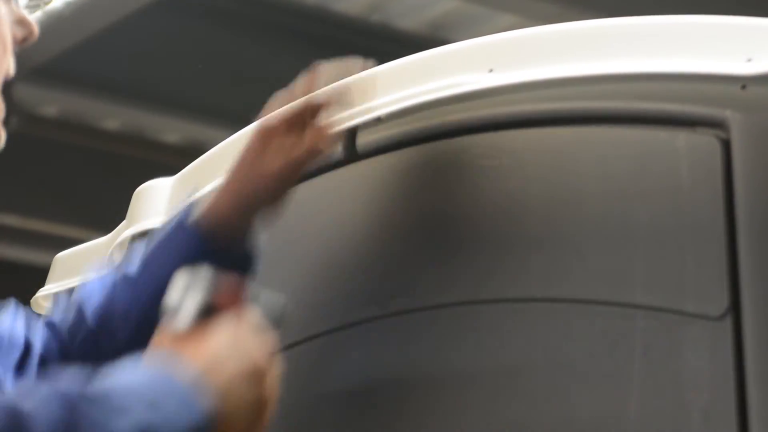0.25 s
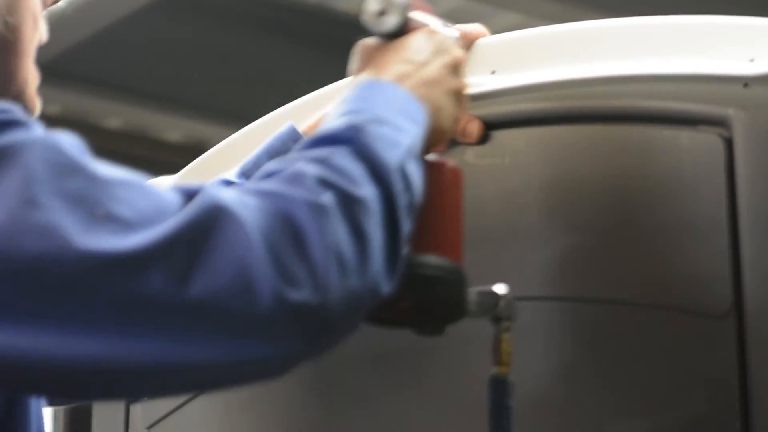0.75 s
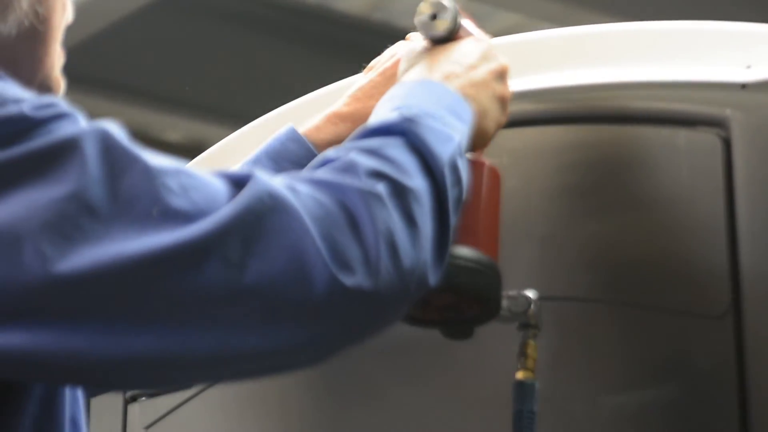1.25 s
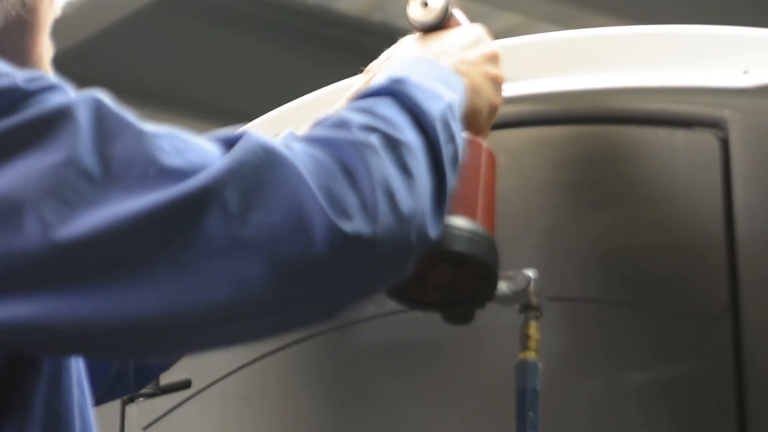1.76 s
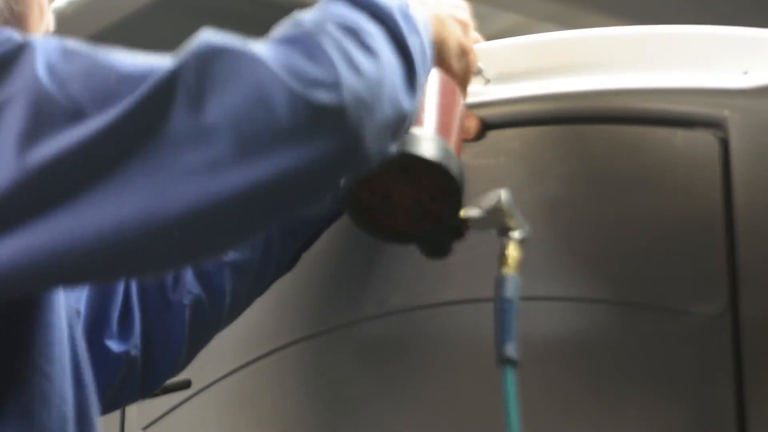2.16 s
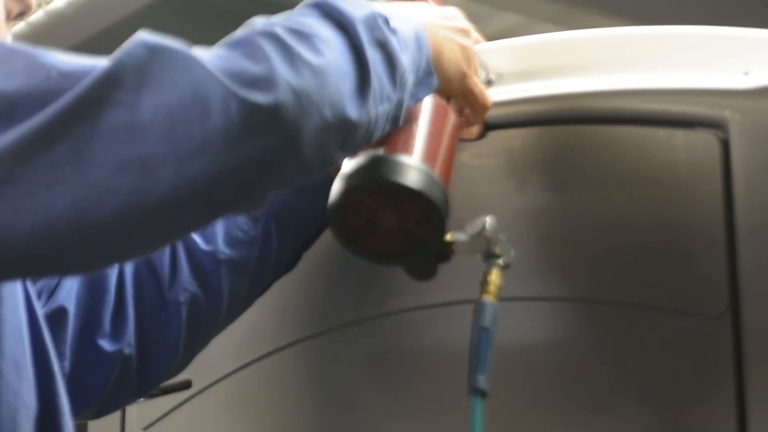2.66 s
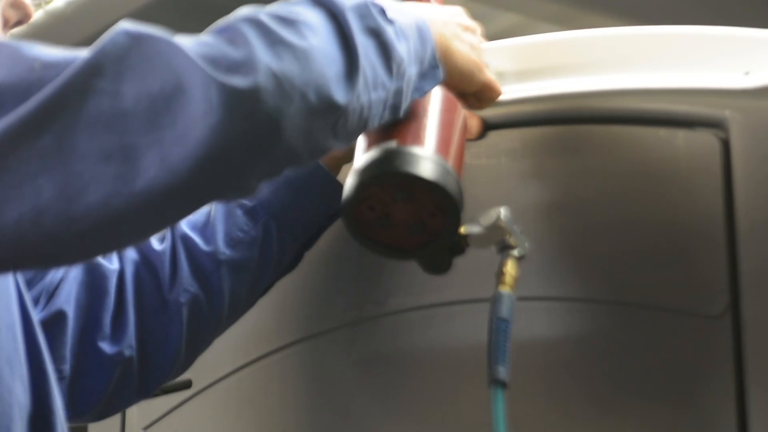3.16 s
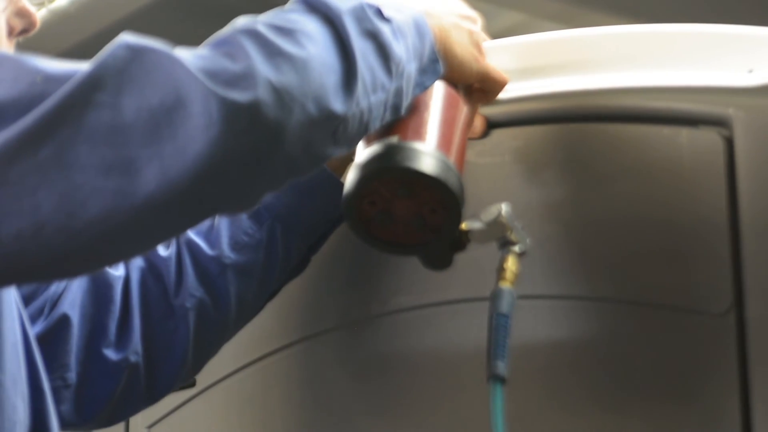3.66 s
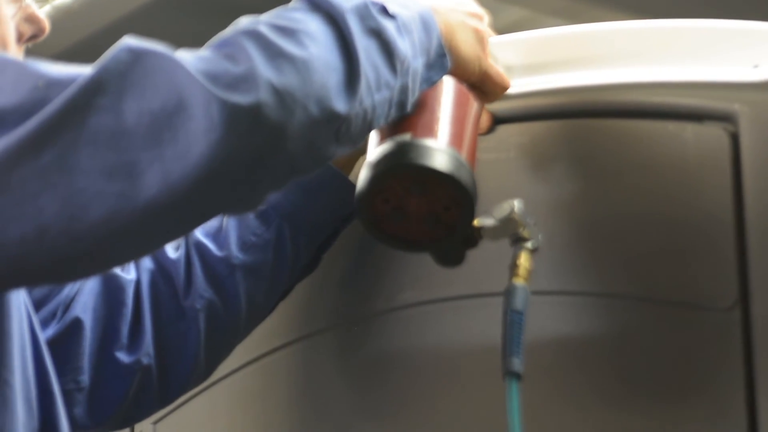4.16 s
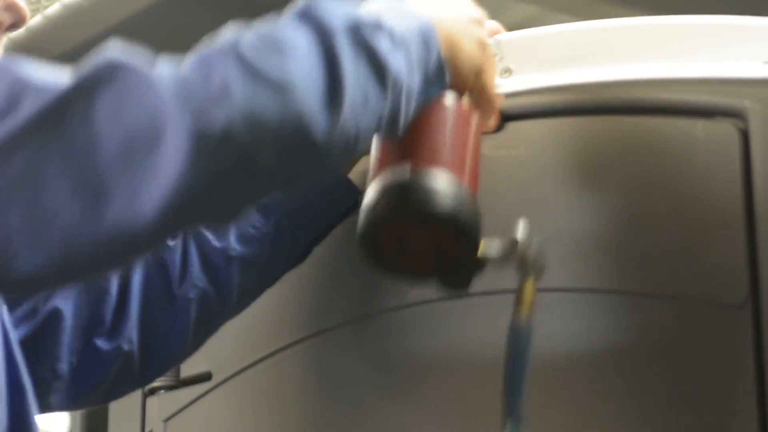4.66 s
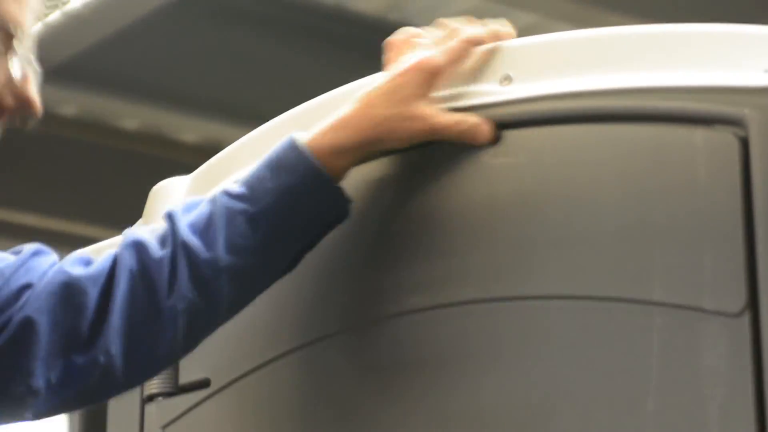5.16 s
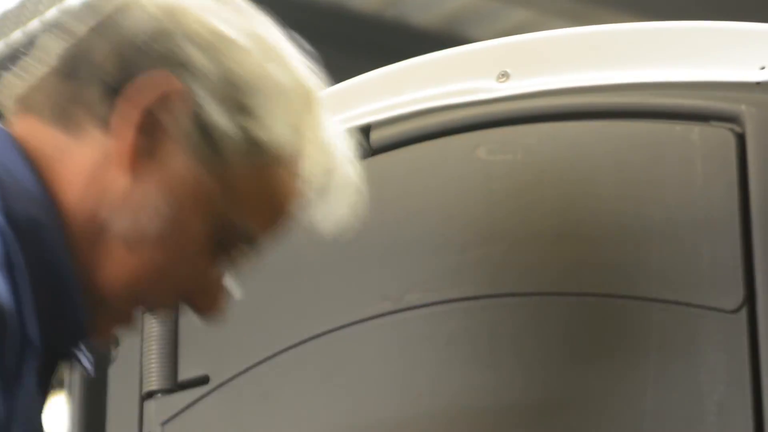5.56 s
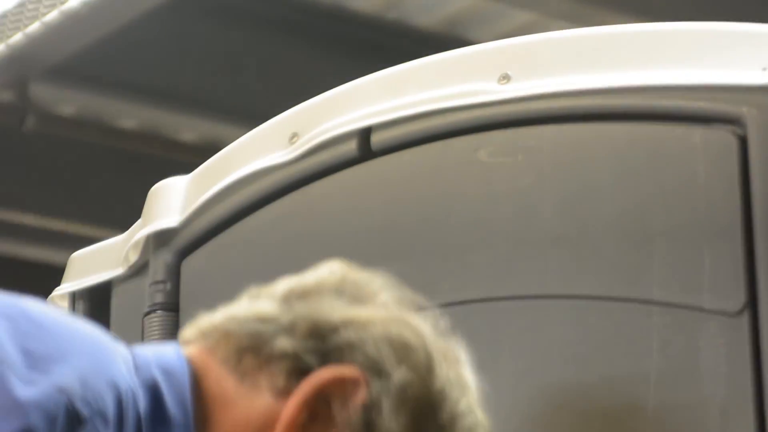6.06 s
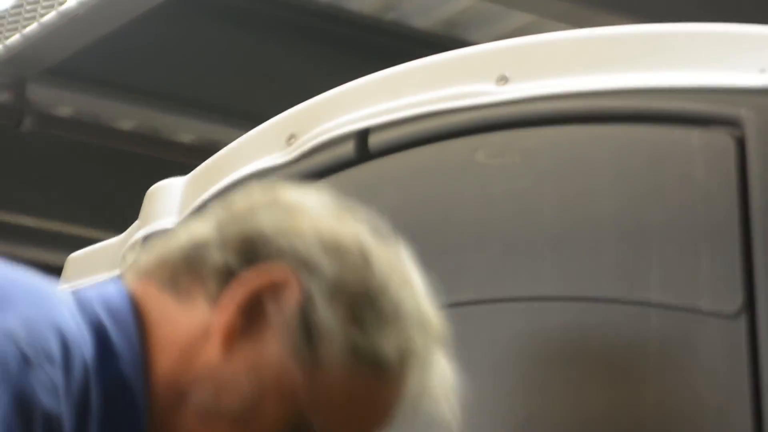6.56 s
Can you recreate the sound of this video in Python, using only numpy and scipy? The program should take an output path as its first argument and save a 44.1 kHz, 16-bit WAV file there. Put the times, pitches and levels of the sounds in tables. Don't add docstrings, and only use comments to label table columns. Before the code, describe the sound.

Steady broadband factory hum with short distant squeaks at first. Nearby, a tool bumps hollow plastic, scrapes and slams, then clicks fast and blasts bright compressed air, which lingers as a hiss. A second, harder snap and sharper blast follow, their hiss dying slowly. Small handling noises and a thin throbbing squeal end it. Close stereo microphone, with reverberation from the hall.

```python
import sys
import numpy as np
from scipy import signal
from scipy.fft import rfft, irfft
from scipy.io import wavfile
from scipy.ndimage import uniform_filter1d

SR = 44100
rng = np.random.default_rng(int(sys.argv[2]) if len(sys.argv) > 2 else 0)


def inscribe(sig):
    pcm = np.round(np.clip(np.atleast_2d(sig).T, -1, 1) * 32767)
    wavfile.write(sys.argv[1], SR, pcm.astype(np.int16))


def gain_from_db(level_db):
    decades = np.asarray(level_db, float) / 20
    return 10 ** decades


N = 301070

# pitch_hz, level_db (per Hz)
HUM = [(25, -50), (60, -44), (110, -12), (270, -16), (500, -8), (1200, -10.5), (2800, -12), (16500, -23)]
# pitch_hz, width_hz, level_db
HUM_PEAKS = [(300, 20, 8.5), (2150, 120, 3), (4230, 250, 2.5), (7300, 1000, 5.5), (11000, 700, 3.5),
             (13300, 1200, 3), (15500, 1100, 9)]
# time_s, level_db
HUM_SWELL = [(0, -1), (1, 0), (1.5, .6), (2.1, -.8), (5.9, -.8), (6.83, -1.5)]
# start_s, length_s, from_hz, to_hz, top_db
CHIRPS = [
    (.122, .078, 1980, 2220, -41.5),
    (.185, .1, 1990, 2320, -42),
]
RUBS = [
    (.28, .22, 2030, 2040, -40),
    (1.33, .45, 2150, 2100, -48.5),
    (6.15, .67, 2200, 2180, -57),
    (.36, .14, 2400, 2400, -45),
]
SWISH = [
    (.12, .46, 2800, 2900, -44),
]
# pitch_hz, time_to_fall_60_db_s
HALL = [(100, 0.79), (260, 0.98), (700, 0.93), (1840, 0.91), (3800, 0.81), (6000, 0.78), (9000, 0.64),
        (14000, 0.21)]
# decay_s, height_over_tail (ratio)
EARLY = (0.0088, 0.41)
# pitch_hz, level_db
WIDTH = [(60, -14), (110, -16), (250, -19.5), (700, -23), (1300, -22.5), (2400, -16.5), (4400, -11.5),
         (9000, -8)]
# start_s, level_db, centre_hz, clack_db, tick_db (last two over the blow)
BUMPS = [(0.4825, -7, 1500, -10, -9), (.616, -15, 1070, -35, -19), (.835, -19, 830, -16, -34),
         (1.225, -34.5, 1220, -10, -24), (1.521, -23, 890, -33, -15), (1.728, -25.5, 1100, 0.5, -3.5),
         (1.912, -33, 820, -14, -4), (2.134, -23, 870, -21, -30), (2.788, -27.5, 880, -18, -25),
         (3.948, -18, 1420, -16, -11), (4.472, 3.5, 2150, -30, -22), (5.042, -14.5, 980, -19, -20),
         (6.707, -33.5, 1200, -7, -24)]
SCRAPES = [(0.623, -24.5, 576, -32, -34), (2.189, -10.5, 720, -26, -53), (2.202, -23, 1110, -25, -38),
           (4.03, -16.5, 1550, -7, -10), (4.1, -21, 1300, -12, -22), (4.425, -11.5, 1520, -17, -24),
           (5.359, -28, 1280, 1, -25), (5.762, -30.5, 960, -22, -32), (5.805, -32, 1440, -27, -32),
           (5.845, -30.5, 1550, -16, -36), (5.874, -39, 1900, -2, 5), (6.027, -34.5, 2380, 0.5, 4),
           (6.222, -31.5, 1460, -11, -15), (6.32, -35, 1360, -9, -26), (6.449, -43, 555, -9, -25)]
TICKS = [(.842, -16, 1950, -31, -13), (1.771, -34.5, 1900, -14, 7), (2.898, -12.5, 1650, -24, -20),
         (2.906, -6, 2060, -16, -4), (2.913, -7.5, 1950, -15, -4), (3.982, -8, 1960, -8, -5),
         (4.0115, -7, 1950, -17, -22), (4.021, -26, 1900, -15, -12), (4.049, -27, 1900, -18, -10),
         (4.423, -9.5, 1860, -10, -10), (4.45, -26, 1900, 3, -6), (5.583, -12, 2060, -10, -28),
         (5.879, -31, 1900, 1, -12), (6.03, -27.5, 1840, 4, -15), (6.043, -38, 2500, -4, 16)]
SLAM = [
    (2.2277, -3.5, 1140, -6, -5.5),
    (2.2515, -4.5, 760, -11, -30),
]
# rise_s, crack_s, rattle_share (ratio), rattle_s, hall_db, thud_db, clack_sign (1 or -1)
STRIKES = [
    (0.00027, 0.0075, 1.08, 0.0088, 1.5, -20.5, -1),
    (0.00021, 0.0034, 0.25, 0.014, -3, -21.5, -1),
    (0.0082, 0.0019, 3, 0.055, -3.5, -25, -1),
    (0.00039, 0.0077, 0.95, 0.024, -1, -17, 1),
]
BODY_SPREADS = (1.7, 1.5, 1.7, 1.8)
# pitch_hz, level_db, time_to_fall_60_db_s
SHELL = [(650, 19, 0.012), (964, -3, 0.099), (1233, 11.5, 0.042), (1650, 0, 0.013), (1950, -33, 0.02),
         (2106, 15, 0.0083)]
# pitch_hz, time_to_fall_60_db_s
PANEL = (106, 0.4)
# start_s, level_db
THUMPS = [(0.488, -45.5), (0.632, -67), (0.843, -53.5), (1.533, -58), (1.739, -46), (2.24, -25.5),
          (2.9, -27.5), (3.282, -46.5), (4.202, -57), (4.45, -31.5), (5.048, -57)]
# start_s, level_db, length_s
PUFFS = [
    (.49, -72, 0.066),
    (2.22, -66, .25),
    (2.885, -78, .2),
    (3.274, -37, 0.16),
    (4.0, -63, 0.074),
    (4.46, -56, 0.26),
]
# opens_s, shuts_s, peak_db, hold_s, closing_s
PULLS = [
    (2.89, 3.089, -18.5, .2, 0.027),
    (4.44, 4.467, -13.5, .1, .004),
]
BURSTS = [
    (3.935, 4.203, -28.5, 0.15, 0.046),
    (4.47, 4.655, -11, 0.0034, 0.013),
]
EXHAUSTS = [
    (3.269, 4.445, -15, 0.09, 0.091),
    (4.642, 5.638, -20, 0.029, 0.24),
]
# rise_s, then for roar, jet and fizz level_db (over the peak) and bleed_db_per_s
PULL = (0.046, (-6, 0, 1.1), (11, 11, 11))
BURST = (0.0012, (-5.5, 0, -3.5), (31, 90, 110))
EXHAUST = (0.0078, (-0.61, 0, 2.4), (71, 60, 35.4))
# pitch_hz, level_db (per Hz)
BLAST = [(88, -50), (150, -16), (406, -9.5), (740, -2), (2800, 1.5), (9960, -7), (13300, 14), (15900, 13.5)]
# pitch_hz, width_hz, level_db
VALVE = [(3950, 180, 3), (5950, 100, 1.5), (8750, 200, 2.5), (10900, 200, 5.5), (13400, 830, -1.5)]
# pitch_hz, level_db (per Hz)
LEAK = [(150, -31), (700, -13.5), (1500, -2.5), (2500, -4), (3600, -3), (10400, -18.5), (12800, -13.5),
        (16000, -12)]
# pitch_hz, width_hz, level_db
NOZZLE = [(2510, 310, 7), (6520, 740, -11.5), (8270, 530, 10.5), (13300, 700, 3.5), (5100, 200, 4.5)]
# start_s, length_s, pitch_hz, width_hz, level_db
PIPES = [
    (2.9, .3, 4200, 110, -34),
    (2.9, .22, 5900, 110, -31),
    (2.93, .14, 11100, 200, -30),
    (3.07, .2, 7750, 110, -42),
]
# time_s, level_db
THROBS = [(6.045, -33), (6.07, -32), (6.098, -34), (6.141, -26), (6.171, -29), (6.205, -29.5), (6.248, -30),
          (6.284, -31), (6.313, -34), (6.335, -30.5), (6.364, -33.5), (6.41, -36.5), (6.447, -42),
          (6.485, -45), (6.514, -37), (6.545, -38)]


def evened(x):
    return x / np.sqrt(np.mean(x ** 2) + 1e-20)


def read(points, hz):
    f, value = np.transpose(points)
    return np.interp(np.log(hz + 1), np.log(f + 1), value)


def peaks_db(peaks, hz):
    return sum(db / (1 + ((hz - f) / width) ** 2) for f, width, db in peaks)


def add(mix, start_s, sound):
    part = mix[..., round(start_s * SR):][..., :sound.shape[-1]]
    part += sound[..., :part.shape[-1]]


def band(x, lo_hz, hi_hz, order=2):
    return signal.sosfilt(signal.butter(order, [lo_hz, min(hi_hz, SR / 2.1)], "band", fs=SR, output="sos"), x)


def resonate(x, hz, width):
    turn = np.exp(2j * np.pi * np.cumsum(hz) / SR)
    r = np.exp(-np.pi * width / SR)
    return 2 * (turn * signal.lfilter([1 - r], [1, -r], x / turn)).real


def noise(spectrum, peaks):
    frames, hz = N // 256 + 5, np.fft.rfftfreq(1024, 1 / SR)
    a, b, c, d, patches = rng.standard_normal((frames, 513, 5)).T
    patches = uniform_filter1d(patches, size=10, axis=0)
    patches = evened(uniform_filter1d(patches, size=12, axis=1))
    shape_db = read(spectrum, hz) + peaks_db(peaks, hz)
    z = np.array([a + 1j * b, c + 1j * d]) * gain_from_db(shape_db[:, None] + 0.5 * patches)
    return evened(signal.istft(z, nperseg=1024, noverlap=768)[1][:, :N])


def hall_hum():
    swell_db = np.interp(np.arange(N) / SR, *np.transpose(HUM_SWELL))
    return gain_from_db(-41.5 + swell_db) * noise(HUM, HUM_PEAKS)


def whistle(times, hz, db, width, second_db):
    t = np.arange(times[0], times[-1], 1 / SR)
    hz, drive = np.interp(t, times, hz), rng.standard_normal(len(t))
    tone = evened(resonate(resonate(drive, hz, width), hz, width))
    tone = tone + gain_from_db(second_db) * evened(resonate(drive, 2 * hz, 2 * width))
    return gain_from_db(np.interp(t, times, db)) * tone * signal.windows.tukey(len(t), .1)


def far_tool():
    out = np.zeros(N)
    at = np.linspace(0, 1, 9)
    glide = at ** 0.52
    for table, width_hz, edge_db in ((CHIRPS, 60, -2), (RUBS, 170, -4), (SWISH, 2000, -9)):
        for start_s, length, from_hz, to_hz, top_db in table:
            hz = from_hz + (to_hz - from_hz) * glide
            db = top_db + edge_db * abs(2 * at - 1)
            add(out, start_s, whistle(start_s + length * at, hz, db, width_hz, second_db=-17))
    return out


def hall_tails(count):
    taps = np.zeros((count, 2, SR))
    at = np.arange(200, SR - 20, 20) + rng.integers(0, 20, (count, 2, (SR - 201) // 20))
    np.put_along_axis(taps, at, rng.choice([-1., 1.], at.shape), 2)
    hz, t, z = signal.stft(taps, SR, nperseg=256)
    tails = signal.istft(z * gain_from_db(-60 * t / read(HALL, hz)[:, None]), SR, nperseg=256)[1][..., :SR]
    t = np.arange(SR) / SR
    early_s, early_height = EARLY
    tails = tails * (1 - np.exp(-t / 0.0011)) * (1 + early_height * np.exp(-t / early_s))
    return tails / np.linalg.norm(tails, axis=2, keepdims=True)


def blow(strike, spread, blow_db, hz, clack_db, tick_db):
    rise, crack, rattle, length, _, thud_db, clack_sign = strike
    t = np.arange(8192) / SR
    start = 1 - np.exp(-t / rise)
    z = rfft(rng.standard_normal(len(t)) * (np.exp(-t / crack) + rattle * np.exp(-t / length)) * start)
    even = z / np.sqrt(uniform_filter1d(abs(z) ** 2, size=16))
    drive = irfft(even, len(t)) * start * np.exp(-(t / (3 * length + 0.013)) ** 2)

    shell = np.zeros(len(t))
    detune = rng.uniform(0.88, 1.2, len(SHELL))
    for (f, db, t60), shift in zip(SHELL, detune):
        shell += gain_from_db(db - 60 * t / t60) * np.sin(2 * np.pi * f * shift * t)
    ring = signal.fftconvolve(drive, shell / np.linalg.norm(shell))[:len(t)]

    body = band(drive + gain_from_db(-22) * ring, hz / spread, hz * spread, order=1)
    body = band(body, hz / spread ** 2, hz * spread ** 2, order=1)
    thud = band(drive, 250, 550)
    clack = -clack_sign * band(drive, 2600, 5600)
    tick_top_hz = 16000 + 160 * min(blow_db, 0)
    tick = band(drive * np.exp(-t / .025), 5800, tick_top_hz)
    thud_db = thud_db - 3 * np.log2(hz / 1300)
    parts = [(body, 0), (thud, thud_db), (clack, clack_db), (tick, tick_db)]
    return gain_from_db(blow_db + 3.5) * sum(gain_from_db(db) * part / abs(part).max() for part, db in parts)


def blows():
    near, sent = np.zeros(N), np.zeros((3, N))
    dead_shares = (0.98, 0.25, .1, 0.01)
    notch = signal.iirpeak(2930, 2.8, SR)
    tables = (BUMPS, TICKS, SCRAPES, SLAM)
    for strike, spread, dead, table in zip(STRIKES, BODY_SPREADS, dead_shares, tables):
        for k, (start_s, *how) in enumerate(table):
            sound = blow(strike, spread, *how)
            sound = sound - dead * signal.lfilter(*notch, sound)
            add(near, start_s, sound)
            add(sent[k % 3], start_s, gain_from_db(strike[4]) * sound)
    return near, sent


def wall():
    t, out = np.arange(SR // 2) / SR, np.zeros(N)
    panel_hz, panel_t60 = PANEL
    for start_s, db in THUMPS:
        push = rng.standard_normal(len(t)) * np.exp(-t / 0.16)
        boom = resonate(push, panel_hz + 0 * t, 2.86 / panel_t60)
        flap = band(push, 91, 213)
        boom = boom / abs(boom).max() + 1.45 * flap / abs(flap).max()
        add(out, start_s, gain_from_db(db) * boom * np.cos(np.pi * t))
    return out


def puffs():
    t, gust = np.arange(SR) / SR, np.zeros(N)
    for start_s, db, length in PUFFS:
        add(gust, start_s, gain_from_db(db) * (1 - np.exp(-t / 0.019)) * np.exp(-2 * t / length))
    return gust * evened(band(rng.standard_normal((2, N)), 18, 75))


def release(kind, leaks, opens, shuts, peak_db, hold, closing):
    rise, over_db, bleed = kind
    t = np.arange(0, shuts - opens, 1 / SR)
    power = gain_from_db(2 * (peak_db + np.c_[[over_db]].T - np.c_[[bleed]].T * np.maximum(t - hold, 0)))
    leak_db, leak_sag = np.c_[[(-32, -25.5, -30)]].T, np.c_[[(0.1, 4.9, 3.5)]].T
    power = power + leaks * gain_from_db(2 * (leak_db - leak_sag * t))
    return power * (1 - np.exp(-t / rise)) ** 2 * np.minimum((t[-1] - t) / closing, 1)


def air():
    blast, leak = noise(BLAST, VALVE), noise(LEAK, NOZZLE)
    power = np.full((3, N), 1e-12)
    for kind, table, leaks in ((PULL, PULLS, False), (BURST, BURSTS, False), (EXHAUST, EXHAUSTS, True)):
        for row in table:
            add(power, row[0], release(kind, leaks, *row))
    levels = uniform_filter1d(np.sqrt(power), size=90, axis=1)

    open_db, shut_db = -19, -28
    leak_share = np.clip((open_db - 20 * np.log10(abs(levels[1]))) / (open_db - shut_db), 0, 1)
    # the range let through, then the range that sets its level, in Hz
    ranges = [(100, 6500, 2500, 6000), (6500, 10000, 7000, 10000), (10000, 20000, 10000, 15500)]
    jet = 0
    for source, share in ((blast, 1 - leak_share), (leak, leak_share)):
        for level, (lo, hi, a, b) in zip(levels, ranges):
            scale = np.sqrt(np.mean(band(source[0, :SR], a, b, order=4) ** 2))
            jet = jet + np.sqrt(share) * level * band(source, lo, hi, order=3) / scale
    for start_s, length, hz, width, db in PIPES:
        times = [start_s, start_s + length]
        add(jet, start_s, whistle(times, [hz, hz], [db, db - 9], width, second_db=-60))
    return gain_from_db(-1.5) * jet


def metal_squeal():
    t = np.arange(N) / SR
    throb_s = .0115
    throb = np.sqrt(sum(gain_from_db(2 * db) * np.exp(-((t - at) / throb_s) ** 2) for at, db in THROBS))
    hz = 6410 + 12 * evened(band(rng.standard_normal(N), 3.8, 34))
    return 1.02 * throb * np.sin(2 * np.pi * np.cumsum(hz) / SR)


def scene():
    hum = hall_hum()
    far = far_tool() + metal_squeal()
    tails = hall_tails(count=3)
    near, sent = blows()
    near = near + wall()
    jet = air()
    sent[1] += gain_from_db(-7) * jet[0] + gain_from_db(-13) * far
    wet = signal.fftconvolve(sent[:, None], tails, axes=2)[..., :N].sum(0)
    mid, twin = (near + far) * [[1], [.7]] + wet + jet + hum
    side = irfft(rfft(twin) * gain_from_db(read(WIDTH, np.fft.rfftfreq(N, 1 / SR))), N)
    return np.array([mid + side, mid - side]) + puffs()


def band_limit(x):
    return signal.sosfilt(signal.butter(12, 15750, fs=SR, output="sos"), x)


def record(dry):
    limited = signal.oaconvolve(dry, signal.firwin(255, 15900, fs=SR)[None], "same")
    return band_limit(np.clip(limited, -1, 1))


dry = scene()
out = record(dry)
inscribe(out)
```